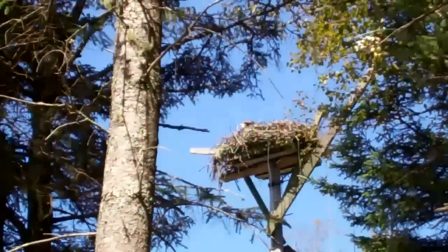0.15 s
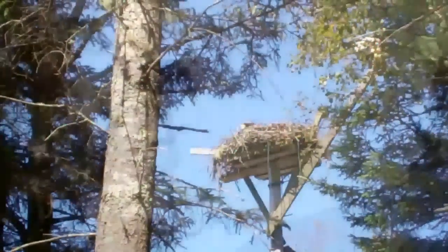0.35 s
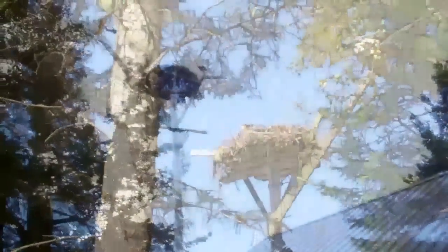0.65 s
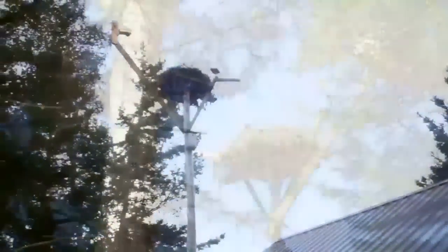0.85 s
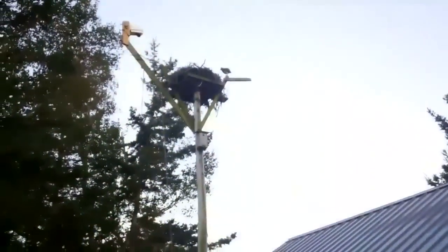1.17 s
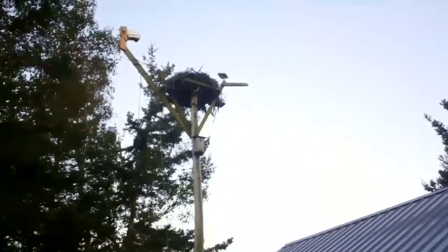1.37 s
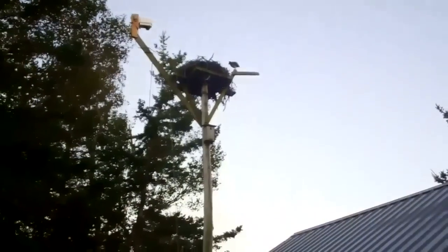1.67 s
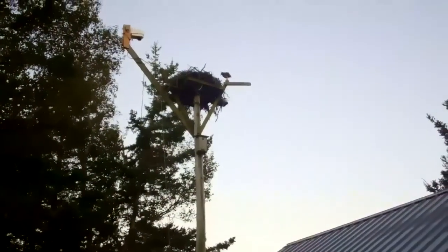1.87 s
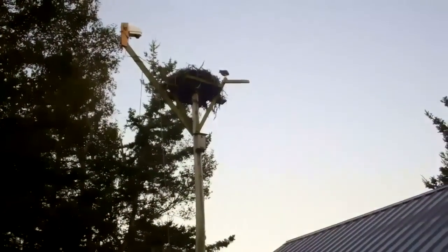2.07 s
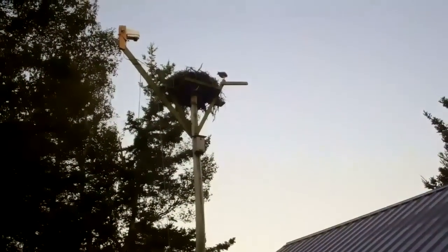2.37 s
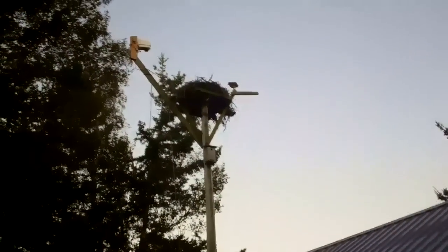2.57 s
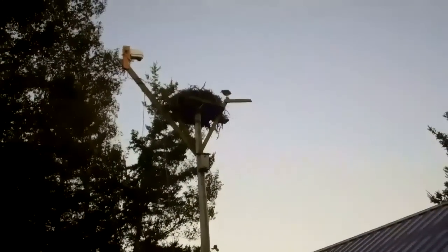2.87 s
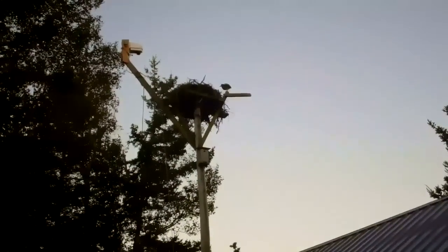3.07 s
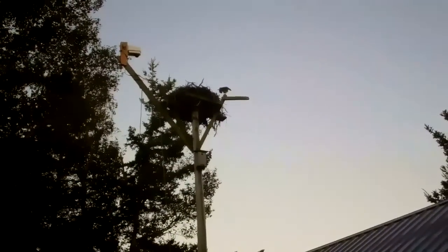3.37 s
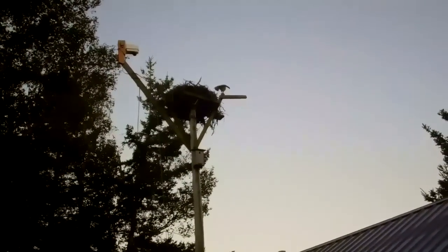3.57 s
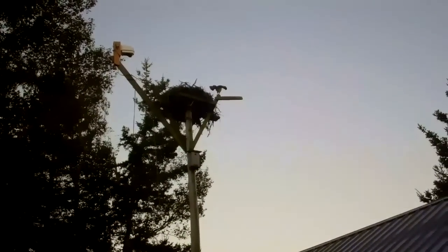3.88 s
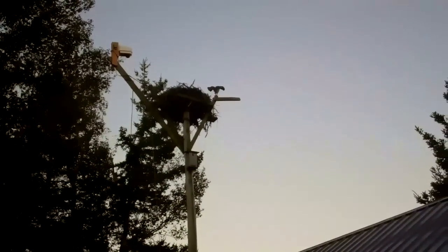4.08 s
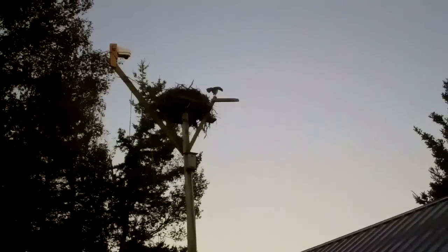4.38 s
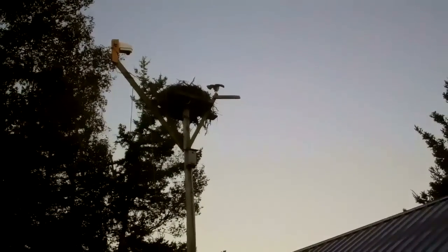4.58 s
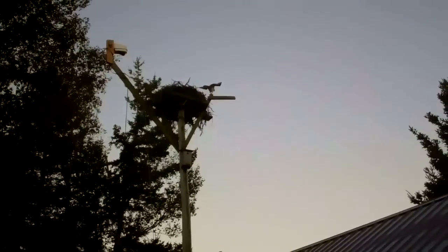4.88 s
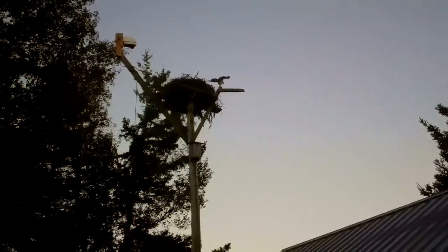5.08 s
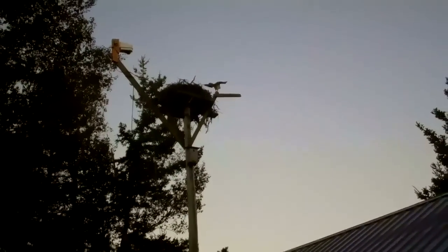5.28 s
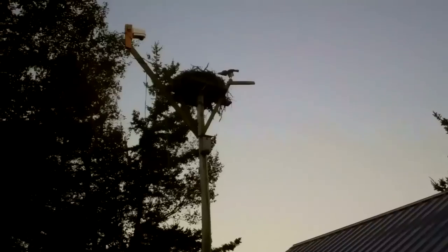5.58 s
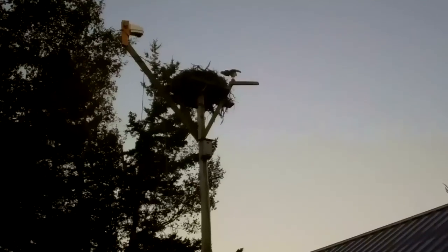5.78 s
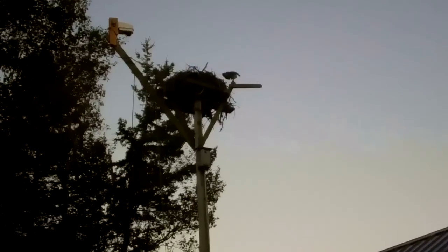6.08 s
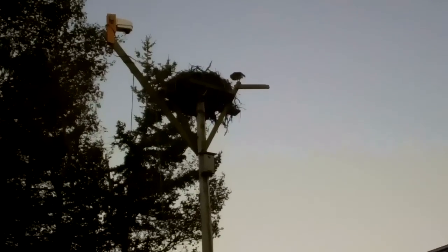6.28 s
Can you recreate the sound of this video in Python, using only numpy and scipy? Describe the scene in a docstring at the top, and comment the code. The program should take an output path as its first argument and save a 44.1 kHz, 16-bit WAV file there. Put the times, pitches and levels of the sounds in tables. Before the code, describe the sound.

From 0 to about 1.3 seconds a soft breezy ambience with a wavering low drone fades away, crossing into quieter outdoor hiss with a faint low machine hum. Two very faint thin calls of a distant small bird occur near 0 and 0.5. At 1.35 an osprey gives one soft peep, then from 1.55 to the end 28 quick chirps, evenly spaced roughly 0.17 seconds apart. Each slides up from a low hoarse register, cracks into a short arched whistle around 3 kHz, and drops back. The first is cleaner; hoarseness soon grows. Pitch climbs until about 3.6 while the calls become duller and fainter, then eases; they strengthen around 4.8 to 5.5 and weaken at the last. The bird is slightly left, with ground, roof and woodland echoes. Small ticks come at 1.8 and 3.05, faint soft knocks at 5.1 and 6.3.

```python
"""A louder breezy ambience with a drone crossfades into a quiet one with a faint hum; an osprey on a nest pole calls.
It gives one soft peep and a run of 28 chirps, heard from the ground among trees.
Each chirp slides up in a low, hoarse register, breaks into a high arched whistle and drops back at its end.
The voice is a phase-driven tone with overtones and noise rasp; delayed copies and scattered noise tails
throw it back from ground, roof and trees. Shaped noise makes the ambiences, ticks and thin calls of a far bird."""
import sys
import numpy as np
from scipy import signal
from scipy.fft import rfft, irfft, next_fast_len
from scipy.io import wavfile

SR = 44100
rng = np.random.default_rng(int(sys.argv[2]) if len(sys.argv) > 2 else 0)


def file_out(sig):
    """Save sig as 16-bit WAV at sys.argv[1]."""
    # one column per channel
    cols = np.atleast_2d(sig).T
    # limit, then scale
    lim = np.clip(cols, -1, 1)
    pcm = np.round(lim * 32767).astype(np.int16)
    wavfile.write(sys.argv[1], SR, pcm)


N = 284004
TIME = np.arange(N) / SR

# The run of chirps. Each row: register break in seconds, length of the whistle in seconds,
# nominal top pitch in Hz, whistle level at the bird in dB.
CHIRPS = [(1.547, 0.043, 2756, -24.5), (1.712, 0.043, 2802, -24.5), (1.88, .043, 2807, -25),
          (2.054, 0.037, 2803, -24), (2.226, 0.047, 2841, -26), (2.403, 0.049, 2932, -27),
          (2.579, 0.046, 2953, -26.5), (2.749, 0.052, 3019, -28), (2.917, 0.052, 3044, -27.5),
          (3.087, .059, 3194, -31.5), (3.256, 0.063, 3213, -32.5), (3.426, 0.058, 3223, -32.5),
          (3.602, 0.057, 3289, -33.5), (3.768, 0.062, 3262, -33), (3.942, 0.054, 3203, -32.5),
          (4.108, 0.056, 3139, -32.5), (4.283, 0.049, 3064, -32), (4.454, 0.052, 3047, -32.5),
          (4.627, 0.052, 3104, -30.5), (4.801, 0.059, 3107, -28), (4.982, 0.055, 3066, -26),
          (5.162, 0.06, 3039, -25.5), (5.348, 0.059, 3050, -26.5), (5.533, 0.059, 3076, -25.5),
          (5.717, .061, 3069, -27.5), (5.902, .061, 3064, -27), (6.1, 0.059, 3031, -28.5),
          (6.286, 0.06, 3032, -31.5)]


def amp(db):
    """Decibels to gain."""
    return 10 ** (np.asarray(db) / 20)


def unit(x):
    """Scales to rms 1."""
    return x / np.sqrt(np.mean(x ** 2) + 1e-20)


def read(points, hz):
    """A spectrum's value, interpolated on a log-frequency axis."""
    f, value = np.transpose(points)
    return np.interp(np.log(hz + 1), np.log(f + 1), value)


def filtered(x, points):
    """A sound the length of the scene, coloured by a curve of Hz and dB."""
    return irfft(rfft(x) * amp(read(points, np.fft.rfftfreq(N, 1 / SR))), N)


def add(mix, s, sound):
    """Mixes a sound in at time s."""
    part = mix[max(round(s * SR), 0):][:len(sound)]
    part += sound[:len(part)]


def noise(spectrum, size):
    """Noise of rms 1 with the given spectrum."""
    gain = amp(read(spectrum, np.fft.rfftfreq(size, 1 / SR)))
    return unit(irfft(rfft(rng.standard_normal(size)) * gain, size))


def band(hz, width_hz, size):
    """Noise in a bell-shaped band, rms about 1; around 0 Hz it is a random waver."""
    length = next_fast_len(size + SR // 4)
    bell = np.exp(-.5 * ((np.fft.rfftfreq(length, 1 / SR) - hz) / width_hz) ** 2)
    return unit(irfft(rfft(rng.standard_normal(length)) * bell, length))[:size]


def gate(t, start, end, rise, fall):
    """A smooth opening centred on start and closing centred on end."""
    opening = np.sin(np.pi / 2 * np.clip((t - start) / rise + .5, 0, 1)) ** 2
    closing = np.sin(np.pi / 2 * np.clip((end - t) / fall + .5, 0, 1)) ** 2
    return opening * closing


def osprey():
    """The bird's own voice, close up: a peep that follows drawn pitch and level, then the run of chirps."""
    # The opening peep. Each row: time in seconds, pitch in Hz, level at the bird in dB.
    peep_points = [(1.346, 2294, -54), (1.357, 2357, -41.5), (1.378, 2618, -42), (1.396, 2656, -31.5),
                   (1.405, 2628, -33), (1.415, 2430, -65)]
    # how a chirp starts: slide pitch relative to the whistle, rise of the whistle in s
    usual_onset = (0.7565, 0.0047)
    first_onset = (.70, 0.026)  # lower and slower
    voice = np.zeros(N)
    s, hz, db = np.transpose(peep_points)
    t = np.arange(s[0], s[-1], 1 / SR)
    level_db = np.interp(t, s, db)
    peep_hz = np.interp(t, s, hz)
    peep = syrinx(peep_hz, [(2, 2), (3, -5.0), (4, -13)], bright_db=-10.5, jitter=0.0038, shimmer=0.038)
    add(voice, s[0], amp(level_db) * peep)
    for k, row in enumerate(CHIRPS):
        onset = usual_onset if k else first_onset
        add(voice, *chirp(*row, *onset))
    return voice


def chirp(s, hold, top_hz, whistle_db, low_ratio, rise_s):
    """Low slide, break into the whistle, and a short fall back to the low register."""
    # Overtones of the whistle. Each row: multiple of the pitch, relative strength in dB.
    whistle_tones = [(2, 0.5), (3, -20), (4, -29)]
    # Overtones of the low register. Each row: multiple of the pitch, relative strength in dB.
    slide_tones = [(.5, -23.5), (1.5, -6.5), (2, 2.5), (2.5, -27), (3, -18), (4, -41), (5, -27)]
    # Tones made where both registers meet. Each row: multiple of the whistle, multiple of the low register,
    # strength in dB relative to the whistle before hoarseness.
    side_tone_rows = [(2, -1, -29), (1, 1, -27.5), (2, 1, -44), (2, 2, -40)]
    # Rasp of air in the throat. Each row: frequency in Hz, relative level in dB per Hz.
    rasp_spectrum = [(900, -18), (1800, -6), (2300, -6), (3000, -9.5), (4000, 6.5), (5400, -1.5),
                     (6300, -1.5), (7300, -6.5), (8700, -5), (10500, -11), (12000, -24), (14000, -22)]
    t = np.arange(-.05, .1, 1 / SR)  # the register breaks at 0
    lead, slide_re_db, slide_bright_db, bright_db, upper_db, hoarse_db = voice_at(s, top_hz)
    low_hz, slide_db = low_ratio * top_hz, whistle_db + slide_re_db
    hoarse = amp(hoarse_db)

    # the slide starts faintly, climbs and swells, and turns purer just before the break
    climb = 4.3 * (np.minimum(t, .002) + 0.00667)
    bend = 130 * np.minimum(t + 0.00699, 0) ** 2
    slide_hz = low_hz * (1.0035 + climb - bend)
    run_up = amp(-19) * gate(t, -lead - .01, -.012, .005, .01)
    growth = amp(1 + 1520 * np.minimum(t + 0.014, 0))
    swell = amp(slide_db) * (gate(t, -lead, -0.00056, 0.006, 0.004) * growth + run_up)
    purer_db = 500 * np.clip(t + 0.017, 0, .01)
    slide = swell * syrinx(slide_hz, slide_tones, slide_bright_db - purer_db,
                           jitter=0.0074 * hoarse, shimmer=0.036 * hoarse)

    # the whistle arches, brightest at the top, and sags as the pressure runs out
    arch = np.clip((t - 0.438 * hold) / .03, -1.2, 1.5)
    sag = 95 * np.clip(t - .046, 0, .02) ** 2
    whistle_hz = top_hz * (1.006 - .056 * arch ** 2 - sag)
    blown = gate(t, 0, hold, rise_s, 0.012) * amp(whistle_db + 0.28 * arch ** 2)
    overtones = [(k, db + upper_db * (k > 2)) for k, db in whistle_tones]
    whistle = blown * syrinx(whistle_hz, overtones, bright_db - 1 - 5.7 * arch ** 2,
                             jitter=0.0039 * hoarse, shimmer=0.025)

    # the low register murmurs on under the whistle; their sum and difference tones flank it
    under_hz = whistle_hz * .755 * (1 + .024 * hoarse * band(0, 90, len(t)))
    murmur = syrinx(under_hz, slide_tones, bright_db=-33.0, jitter=0.0056, shimmer=0.26)
    under = amp(-20) * hoarse * blown * murmur
    side_tones = 0
    for whistle_multiple, under_multiple, db in side_tone_rows:
        hz = whistle_multiple * whistle_hz + under_multiple * under_hz
        side_tone = syrinx(hz, [], bright_db=0, jitter=0.00089, shimmer=0.29)
        side_tones = side_tones + amp(db) * hoarse * blown * side_tone

    # the low register returns as the pressure drops
    drop_hz = low_hz * (.97 - 7 * np.clip(t - hold, -.01, .02))
    drop_level = amp(slide_db - 11) * gate(t, hold - .004, hold + 0.005, 0.0051, 0.0046)
    drop = drop_level * syrinx(drop_hz, slide_tones, slide_bright_db, jitter=0.011, shimmer=0.099)

    # air rasps in uneven spurts, with an extra burst at the break
    crack = amp(whistle_db - 25) * np.exp(-((t - .001) / 0.0034) ** 2)
    spurts = amp(2.5 * band(0, 120, len(t)) - 1.5)
    airflow = amp(-22.0 - 2.5 * arch ** 2) * blown + amp(-29.5) * swell + crack
    rasp = hoarse * airflow * spurts * noise(rasp_spectrum, len(t))
    return s + t[0], slide + whistle + under + side_tones + drop + rasp


def voice_at(s, top_hz):
    """Warming up strengthens the slide and the hoarseness; straining at high pitch dulls, rasps and lengthens.

    Returns slide length in s, then slide level, three overtone strengths and hoarseness in dB."""
    # Overtone strength along the run. Each row: time in seconds, strength in the slide in dB,
    # strength in the whistle in dB, extra for the whistle's third and fourth harmonics in dB.
    overtone_course = [(1.55, -8, -8.5, 9), (1.72, -5.5, -8.5, -0.5), (2.6, -9, -10.5, -7),
                       (4.4, -8.5, -8.5, 3.5), (4.8, -11, -11.5, -3), (5.2, -10, -7.5, 4.5),
                       (5.38, -16, -7, 3.5), (5.9, -14.5, -8.5, 0.5), (6.12, -13.5, -1.5, -5)]
    warm_up_s = 0.71
    slide_db, slide_cold_db = -1.86, -14  # relative to the whistle; the cold part fades out
    hoarse_db, hoarse_cold_db = -.5, -7
    easy_hz, strained_hz = 3075, 3230  # strain grows from none to full
    slide_s, strain_slide_s = 0.02, 0.0047
    strain_bright_db, strain_hoarse_db = -6, 3
    cold = np.exp(-(s - CHIRPS[0][0]) / warm_up_s)
    strain = np.clip((top_hz - easy_hz) / (strained_hz - easy_hz), 0, 1)
    times, slide_bright_db, bright_db, upper_db = np.transpose(overtone_course)
    return (slide_s + strain_slide_s * strain,
            slide_db + slide_cold_db * cold,
            np.interp(s, times, slide_bright_db),
            np.interp(s, times, bright_db) + strain_bright_db * strain,
            np.interp(s, times, upper_db),
            hoarse_db + hoarse_cold_db * cold + strain_hoarse_db * strain)


def syrinx(hz, overtones, bright_db, jitter, shimmer):
    """A vibrating membrane: a tone with overtones, slightly unsteady in pitch (jitter) and level (shimmer)."""
    size = len(hz)
    phase = 2 * np.pi * np.cumsum(hz * (1 + jitter * band(0, 200, size))) / SR
    tone = np.sin(phase)
    for k, db in overtones:
        multiple = round(2 * k) / 2  # whole and half multiples
        tone = tone + amp(db + bright_db) * np.sin(multiple * phase)
    return np.sqrt(2) * tone * (1 + shimmer * band(0, 290, size))


def outdoors(voice):
    """The direct voice a little to the left, its ground echo, single echoes, near trees and the woods beyond."""
    # How far the bird turns away, so that roof and trees get more of its voice than the listener.
    # Each row: time in seconds, voice thrown to them relative to the direct voice in dB.
    turned = [(1.4, 5), (1.57, -1.5), (1.85, 2.5), (2.6, 6), (3.62, 13), (4.65, 12), (4.85, 4.5),
              (5.55, 2.5), (6.3, 5.5)]
    # Single echoes from the roof and trunks. Each row: delay in seconds, left gain, right gain.
    echoes = [(0.0207, 0.012, 0.02), (.033, 0.041, 0.014), (0.0339, 0.1, 0.074), (.0405, .09, .04),
              (.046, 0.062, 0.016)]
    ground_delay_s, ground_gain = .00618, .44
    thrown = voice * amp(np.interp(TIME, *np.transpose(turned)))
    # the close copy off the ground beats with the gliding pitch
    delay_turn = np.exp(-2j * np.pi * np.fft.rfftfreq(N, 1 / SR) * ground_delay_s)
    ground = irfft(rfft(voice) * delay_turn, N)
    out = (voice + ground_gain * ground) * amp([[1.7], [-3.8]])
    for delay, left, right in echoes:
        add(out[0], delay, left * thrown)
        add(out[1], delay, right * thrown)
    t = np.arange(SR) / SR
    # as the bird moves its head, different sets of trees answer
    for k in range(3):
        share = np.sqrt(2 / 3) * np.cos(np.pi * (TIME * 0.892 + k / 3))
        near = amp(-17.0) * scatter(gate(t, 0.01, 0.062, 0.015, 0.04))
        far = amp(-18.5) * scatter(gate(t, 0.014, 0.71, 0.038, .1))
        left, right = signal.fftconvolve((thrown * share)[None], near + far, axes=1)[:, :N]
        # the left side is the stronger; a quarter of its tail also reaches the right microphone
        out += amp([[1.5], [-2.5]]) * np.array([left, 0.24 * left + 0.98 * right])
    # the right microphone is shaded from the highest overtones
    out[1] = filtered(out[1], [(5000, 0.5), (8500, -3.0), (12000, -17.5)])
    return out


def scatter(envelope):
    """Many small reflections: a stereo noise tail under an envelope, most treble dying faster than the bass."""
    # Colour of the woods. Each row: frequency in Hz, relative level in dB.
    woods_colour = [(500, 6), (2200, -4.5), (3000, -1), (4500, -1.5), (6000, 3.5), (9000, 4), (13000, 1)]
    # Ring of the woods, before the envelope. Each row: frequency in Hz, time to fall by 60 dB in seconds.
    woods_ring = [(500, 5.5), (2200, 2), (3000, 1.23), (6000, 0.78), (10000, 1)]
    hz, t, z = signal.stft(rng.standard_normal((2, SR)), SR, nperseg=256)
    decay_db = -60 * t / read(woods_ring, hz)[:, None]
    z = z * amp(read(woods_colour, hz)[:, None] + decay_db)
    tail = signal.istft(z, SR, nperseg=256)[1][:, :SR] * envelope
    # unit gain on average from 2000 to 3400 Hz; the tail lasts 1 s, so bins are 1 Hz apart
    power = np.mean(abs(rfft(tail)[:, 2000:3400]) ** 2, axis=1, keepdims=True)
    return tail / np.sqrt(power)


def small_sounds():
    """Ticks and soft knocks as decaying noise bands; a small far bird as narrow noise that swells and fades."""
    # Ticks and knocks nearby. Each row: start in seconds, level before the decay in dB, centre in Hz,
    # width in Hz, decay in seconds.
    ticks = [(1.819, -41, 2900, 2200, .003), (3.053, -34, 3250, 1000, 0.0022), (5.088, -52, 844, 300, 0.05),
             (6.334, -53.5, 172.5, 45, 0.076)]
    # Thin calls of a small far bird. Each row: start in seconds, length in seconds, centre in Hz,
    # level before the swell in dB.
    tseeps = [(0.02, 0.079, 7600, -67), (0.482, 0.075, 7540, -67)]
    out, t = np.zeros(N), np.arange(SR // 4) / SR
    for s, db, hz, width_hz, decay in ticks:
        knock = (1 - np.exp(-8 * t / decay)) * np.exp(-t / decay)
        add(out, s, amp(db) * knock * band(hz, width_hz, len(t)))
    for s, length, hz, db in tseeps:
        swell = np.sin(np.pi * np.minimum(t / length, 1))
        add(out, s, amp(db) * swell * band(hz, 350, len(t)))
    return out


def background():
    """Crossfade from a breezy, droning ambience to a quiet one with wavering hum; a faint high whine."""
    # Breezy ambience. Each row: frequency in Hz, relative level in dB per Hz.
    breezy_spectrum = [(12, -44), (20, -14), (65, -11), (112, -4.5), (152, -16.5), (205, -6), (255, -10),
                       (318, -12), (479, -15.5), (1430, -19), (3950, -23.5), (4530, -25), (7620, -29),
                       (11800, -37.5), (13900, -55)]
    # Hiss of the quiet ambience. Each row: frequency in Hz, relative level in dB per Hz.
    quiet_spectrum = [(5, -17.5), (22, -10.5), (45, 0.5), (90, -6.5), (170, -9.5), (300, -9.5), (600, -7),
                      (1100, -10.5), (1700, -11.5), (3000, -11.5), (5000, -14.5), (8000, -19),
                      (10500, -28.5), (12500, -26.5), (14000, -63)]
    # Hum of a far machine. Each row: mean frequency in Hz, level before its slow waver in dB.
    hum_tones = [(57.3, -63.5), (117.5, -71)]
    breezy_db, breezy_end_s, crossfade_s = -52, 1.3, 1.05
    quiet_db, quiet_rise_db = -54.5, 12.5
    # the first ambience holds, then fades out linearly while the quiet one's hiss fades in
    first_share = np.clip((breezy_end_s - TIME) / crossfade_s, 0, 1)
    drone = amp(-7.0 + 1.7 * band(0, 11, N)) * band(324.0, 20.0, N)
    breezy = amp(breezy_db) * first_share * (wide(breezy_spectrum) + drone)
    hiss_db = quiet_db - quiet_rise_db * first_share + .5 * band(0, 5, N)
    quiet = amp(hiss_db) * wide(quiet_spectrum)
    hum = 0
    for hz, db in hum_tones:
        phase = 2 * np.pi * np.cumsum(hz * (1 + 0.0108 * band(0, 3.19, N))) / SR
        hum = hum + amp(db) * np.sqrt(2) * np.sin(phase)
    hum = hum * np.clip((TIME - .4) / 0.67, 0, 1) * amp(1.7 * band(0, 3, N))
    whine = amp(-80) * band(7900, 90, N) * np.interp(TIME, [2.5, 4], [1, .3])
    return (breezy + quiet + hum + whine) * amp([[1.1], [-1.1]])


def wide(spectrum):
    """Diffuse noise at two microphones, partly alike in the bass and less so toward the treble."""
    # Likeness of left and right. Each row: frequency in Hz, likeness from 0 to 1.
    likeness = [(30, 0.5), (120, 0.5), (300, 0.45), (700, 0.48), (2000, 0.13), (8000, 0)]
    a, b = rfft(noise(spectrum, N)), rfft(noise(spectrum, N))
    same = np.clip(read(likeness, np.fft.rfftfreq(N, 1 / SR)), 0, 1)
    return irfft(np.array([a, same * a + np.sqrt(1 - same ** 2) * b]), N)


def scene():
    """The osprey among the trees, over the two background ambiences."""
    return outdoors(osprey()) + background() + small_sounds()


def record(dry):
    """The microphone dulls the highest treble and the recorder cuts off above its band limit."""
    # Microphone colour. Each row: frequency in Hz, gain in dB.
    mic_colour = [(10000, 0), (11300, -0.5), (12400, -6), (14000, -6)]
    edge_hz = 14060
    heard = filtered(dry, mic_colour)
    lowpass = signal.firwin(511, edge_hz, window=("kaiser", 9), fs=SR)
    return signal.oaconvolve(heard, lowpass[None], "same")


dry = scene()
out = record(dry)
file_out(out)
```